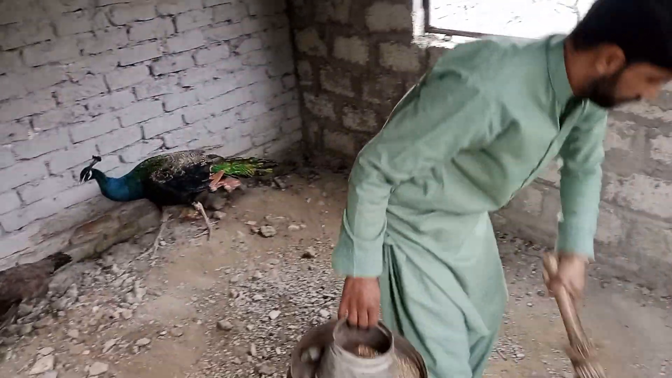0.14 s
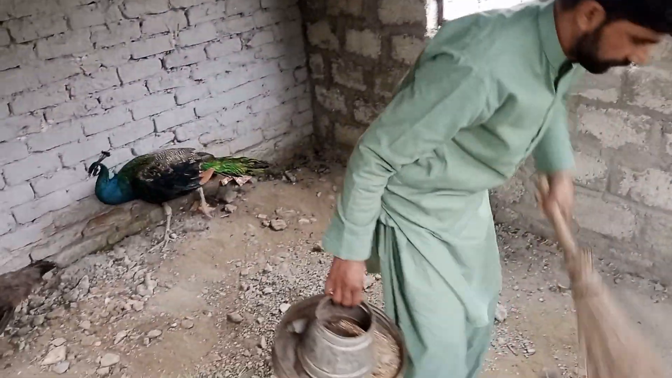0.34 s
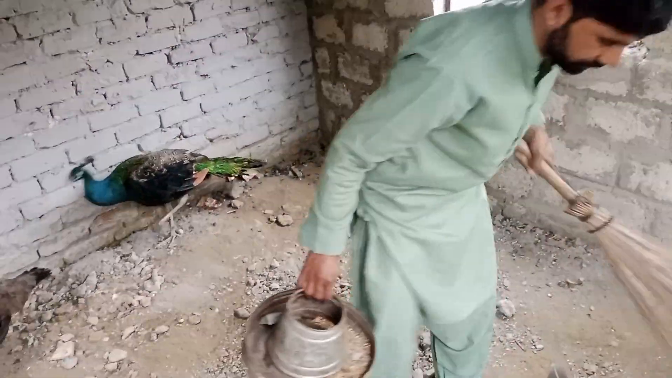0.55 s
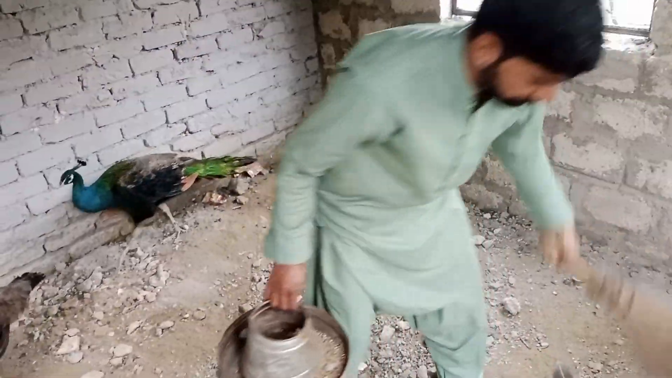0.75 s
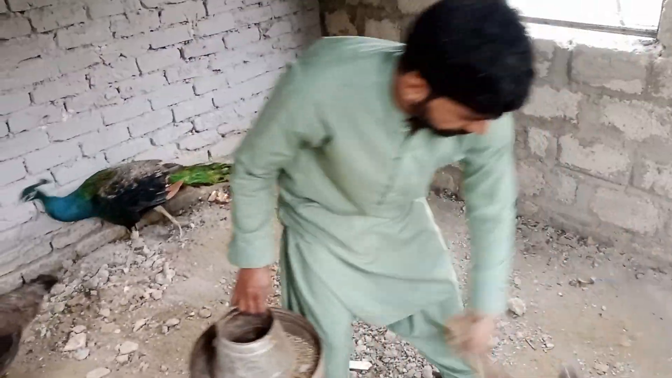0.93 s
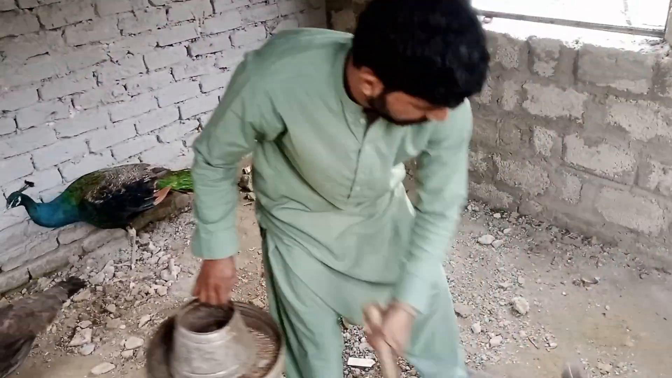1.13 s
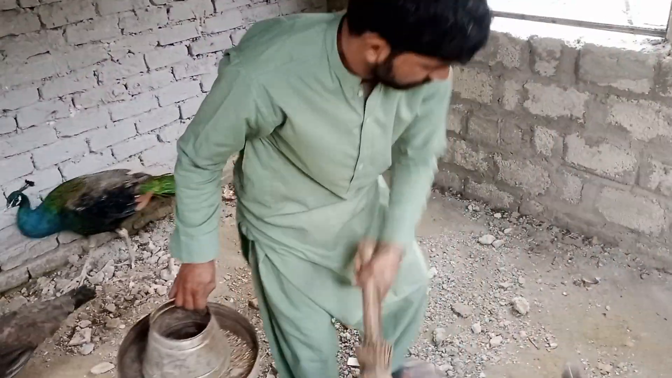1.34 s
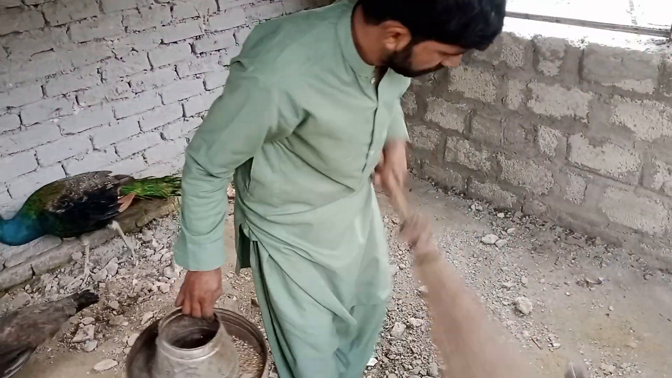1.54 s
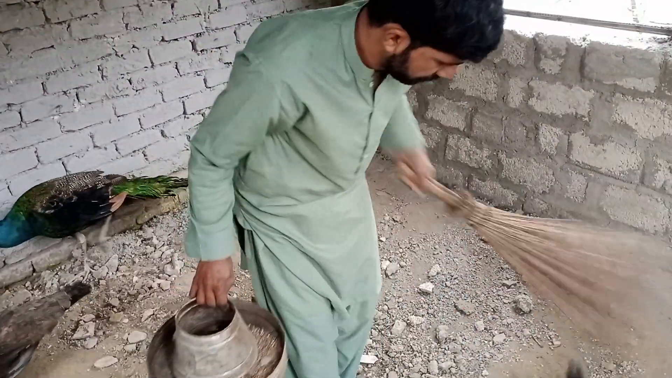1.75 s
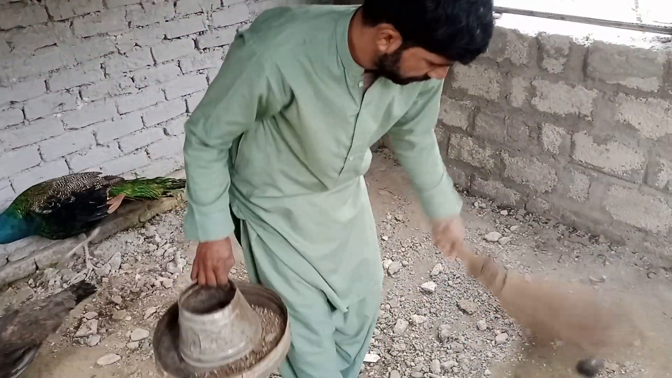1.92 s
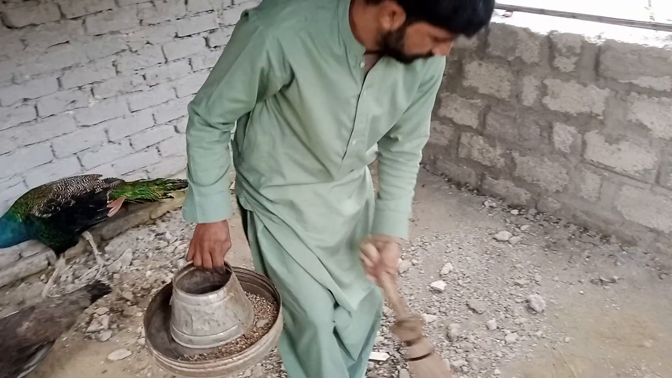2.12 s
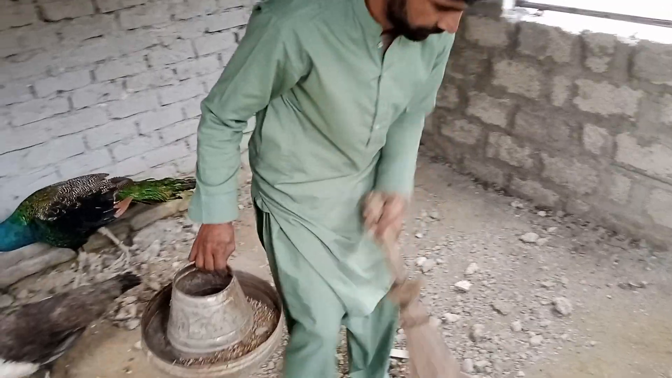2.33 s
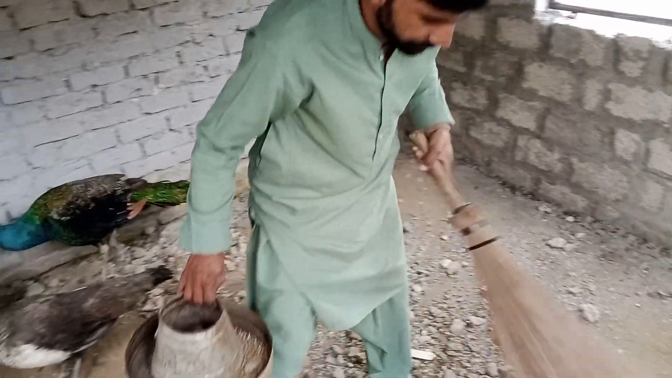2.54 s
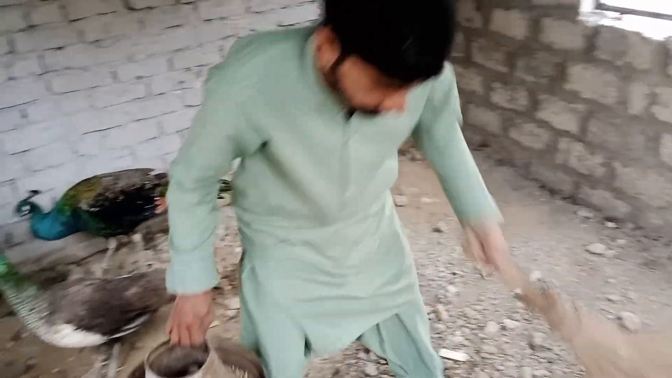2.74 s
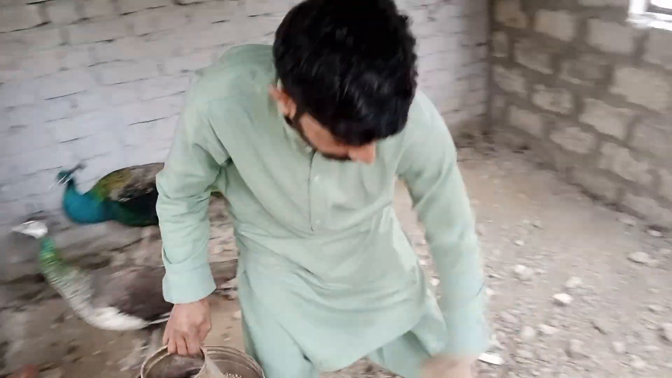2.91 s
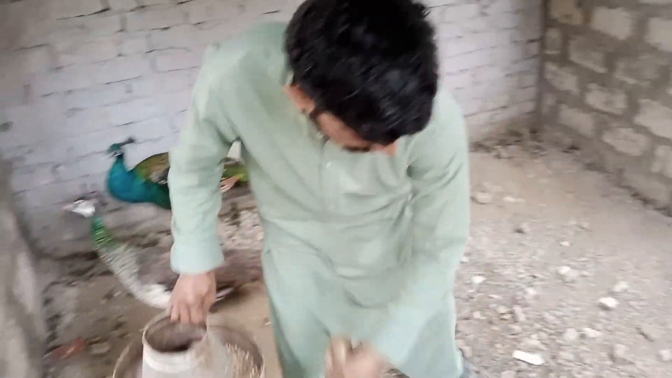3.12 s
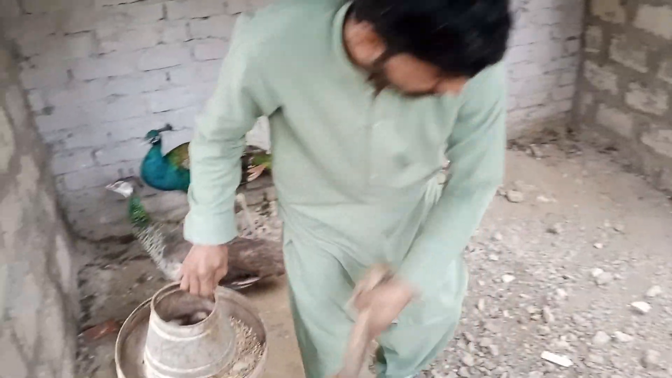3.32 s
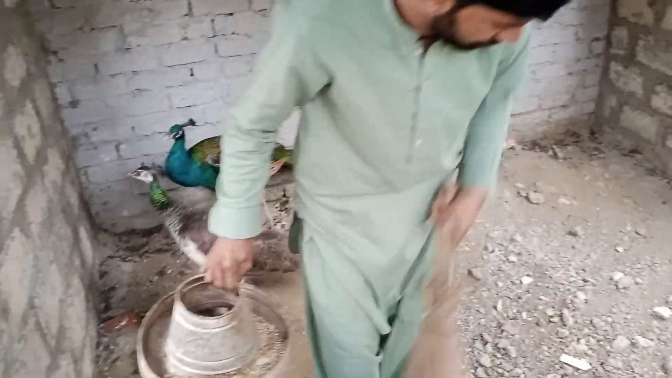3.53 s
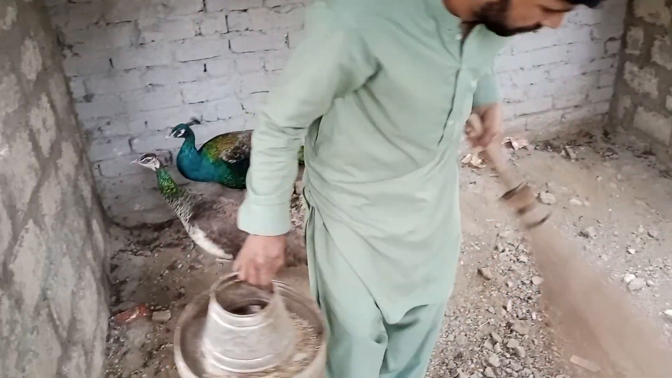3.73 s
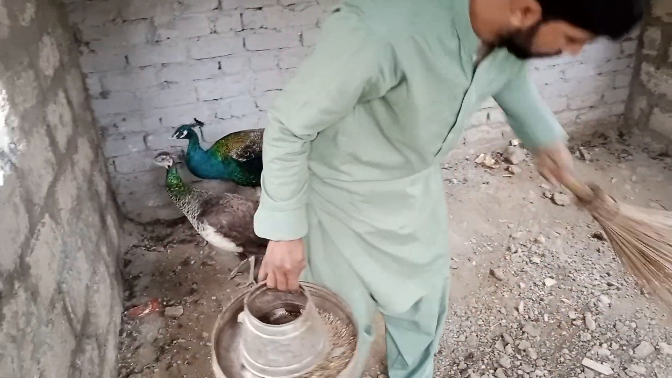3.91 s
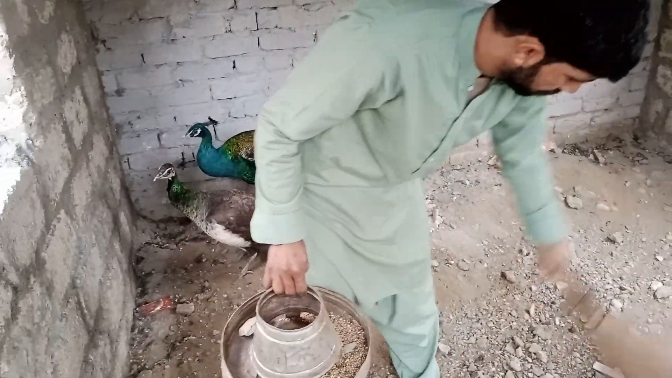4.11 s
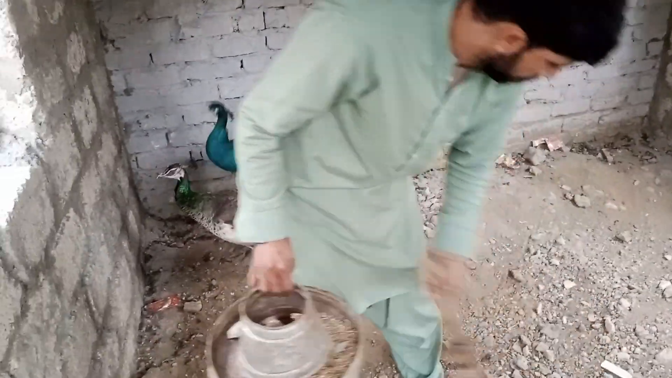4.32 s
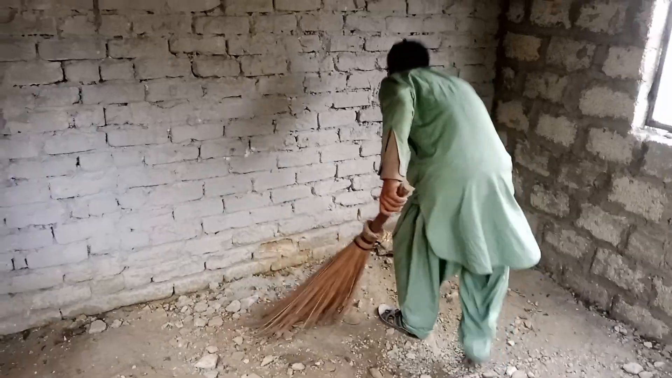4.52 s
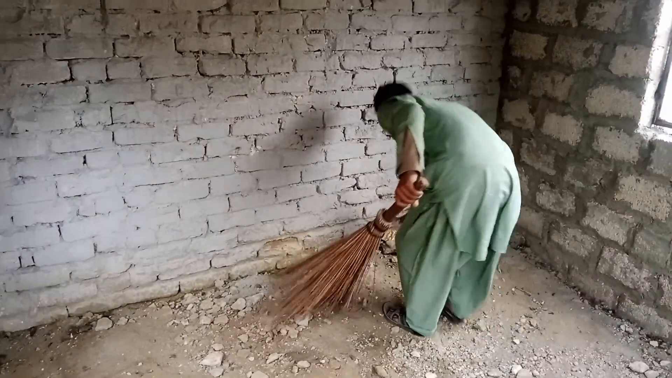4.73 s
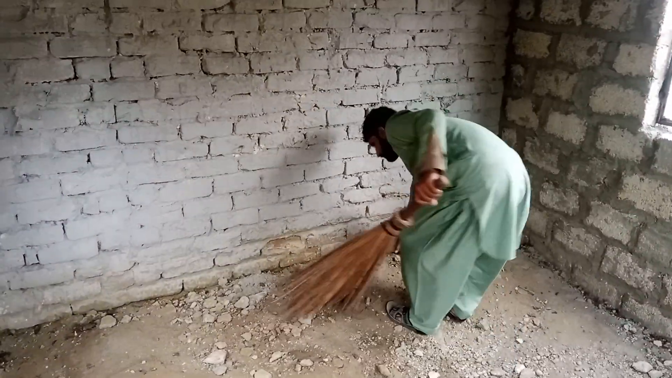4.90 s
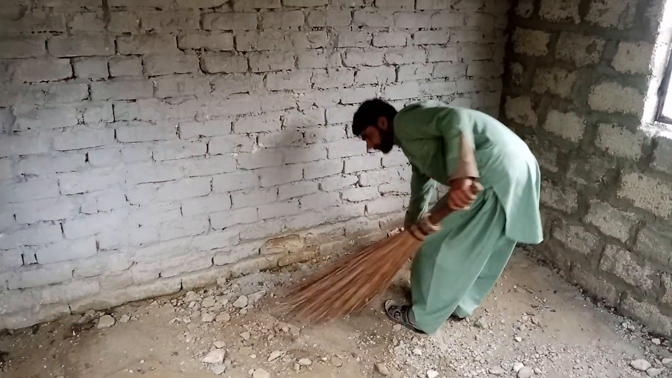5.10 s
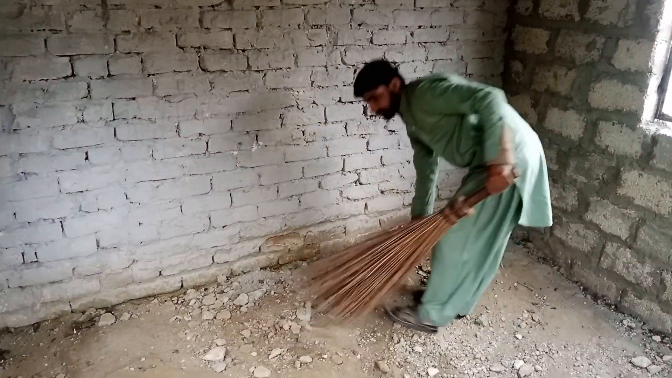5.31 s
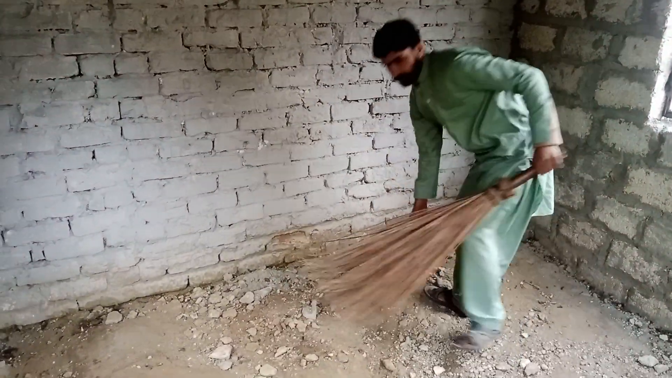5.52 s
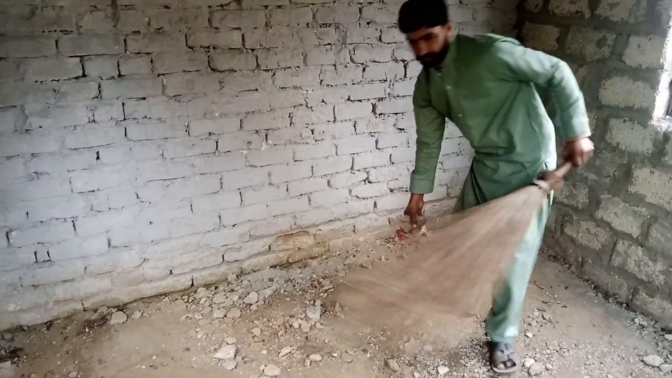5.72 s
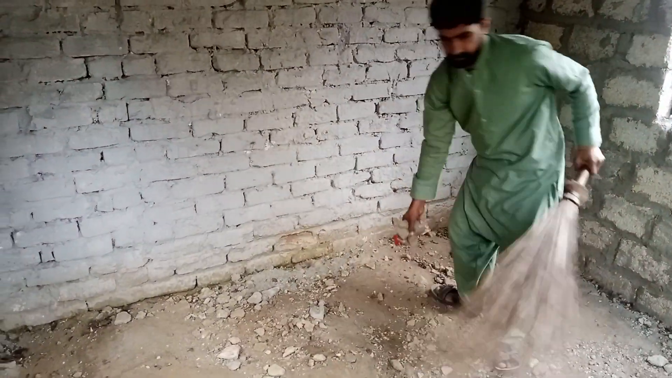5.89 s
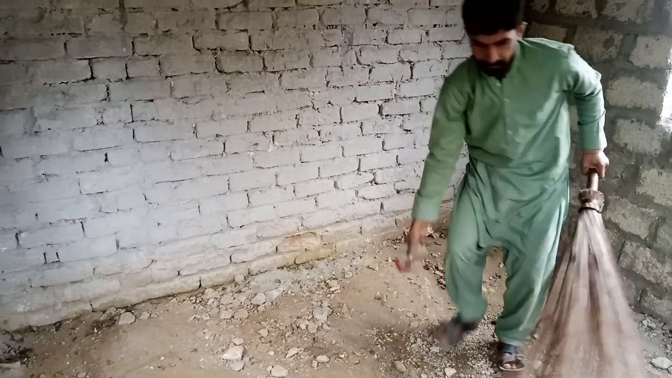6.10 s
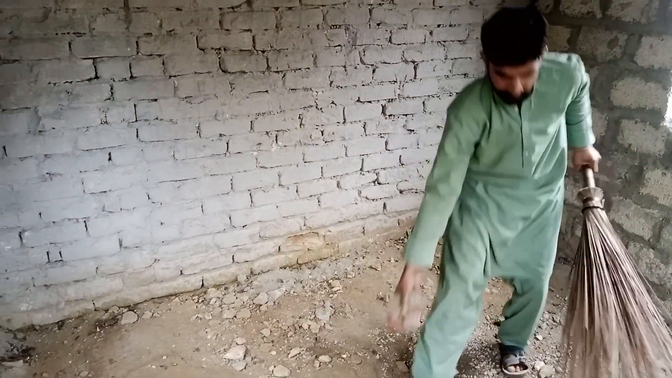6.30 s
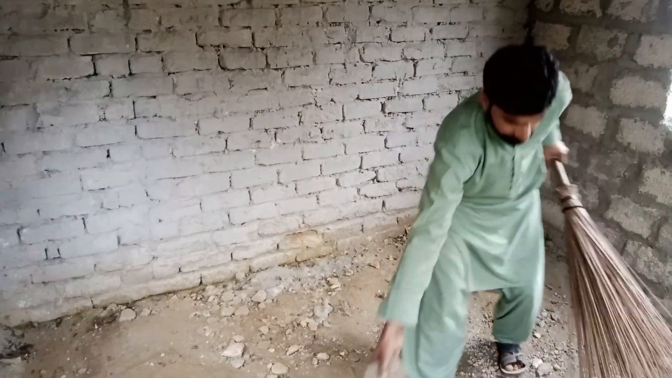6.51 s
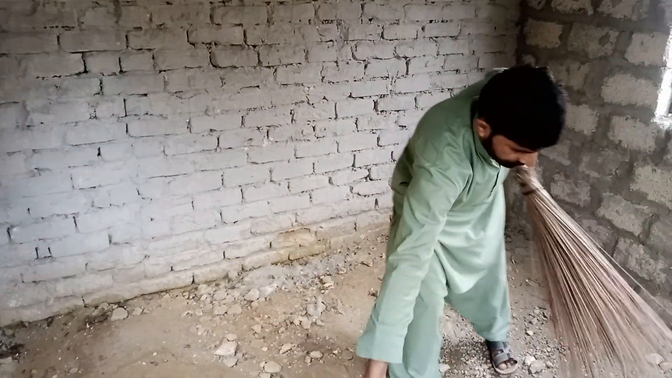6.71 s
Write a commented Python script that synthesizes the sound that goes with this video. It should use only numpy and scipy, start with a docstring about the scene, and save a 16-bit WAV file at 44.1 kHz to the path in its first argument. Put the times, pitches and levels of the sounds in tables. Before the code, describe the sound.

A straw broom rasps over gritty dirt in brisk close strokes, peafowl cluck softly, then the broom turns distant with light scuffs and pebble clicks.

```python
"""Brick shed, dirt floor: a straw broom sweeps grit close to the microphone, then the scene changes to a
farther spot with light dabs and scuffs. The broom is hiss and grain ticks in four registers, driven by
pressure, with loose stones rolling along. Knocked pebbles are resonant rattles; peafowl grunt and cluck as
pulses and puffs through throat resonances; small birds chirp as gliding whistles. The yard murmurs as shaped
noise."""
import sys
import numpy as np
from scipy import signal
from scipy.fft import rfft, irfft, next_fast_len
from scipy.io import wavfile
from scipy.ndimage import uniform_filter1d

SR = 44100
rng = np.random.default_rng(int(sys.argv[2]) if len(sys.argv) > 2 else 0)


def waveform_to_disk(signal):
    """Save audio, clipped to [-1, 1], as 16-bit WAV at the path in sys.argv[1]."""
    frames = np.transpose(np.atleast_2d(signal))
    scaled = np.clip(frames, -1, 1) * 32767
    samples = np.round(scaled).astype(np.int16)
    wavfile.write(sys.argv[1], SR, samples)


N = 297675

SCENE_CHANGE_S = 4.4135  # the broom is near before this time; then the scene changes to a farther spot
# straw on grit as the microphone colours it, a relative spectrum: [f/Hz, density/dB per Hz]
SCRATCH_SPECTRUM = [(60, -50), (170, -24), (500, -20), (1390, -12), (1840, -3.5), (3000, 3.5), (3790, -1.5),
                    (4460, -20.5), (6000, -13), (8000, -33), (12300, -31), (13850, -37), (14600, -26),
                    (15700, -29)]


def broom():
    """Strokes, dabs and scuffs set how hard the grit is rubbed; the straws catch and let go unevenly."""
    # Levels are those of the rasp; weight (coarse grit) and brightness (straw tips) are relative to it.
    # pushes and grazes of the near broom: [full at t/s, held/s, level/dB, rise/dB per s, fall/dB per s,
    # weight/dB, brightness/dB]
    strokes = [(-.05, 0.13, -23, 150, 41.5, -17.5, -14), (.3, 0.056, -34, 100, 78, -18, -20),
               (.76, .05, -40, 321, 38, -15.5, -35), (.85, 0.061, -30.5, 500, 44, -32, -13.5),
               (.95, 0.026, -22.5, 133, 36, -18.5, -17.5), (1.2, 0.11, -22.5, 81, 63.5, -21.5, -16),
               (1.45, 0.02, -35.5, 80, 55, -13.5, -20), (1.885, .06, -40, 600, 40, -31, -18.5),
               (2.038, 0.15, -25, 187, 31.5, -20, -16.5), (2.925, 0.074, -31.5, 500, 59, -6, -6),
               (2.988, 0.083, -21, 153, 57, -22, -15.5), (3.258, 0.042, -23, 106, 61.5, -18.5, -13.5),
               (3.43, 0.035, -36.5, 100, 45, -13.5, -20.5), (4.035, 0.044, -43, 600, 40, -10, -18),
               (4.202, .3, -26, 193, 40, -17, -13.5)]
    # light dabbing at the farther spot, joined by straight lines: [t/s, level/dB, weight/dB, brightness/dB]
    dabs = [(4.42, -41.5, -5.5, -20), (4.62, -47.5, -21, -19), (4.78, -49, -0.5, -23),
            (4.93, -49, -13, -31), (5, -44, -4, -22), (5.16, -45, -12, -20), (5.39, -46.5, -17, -14.5),
            (5.58, -52, -11, -19), (6, -61, -16, -38), (6.44, -59.5, -6, -31), (6.56, -52, -8, -23),
            (6.69, -43.5, -24, -19), (6.72, -60, -18, -29), (6.75, -49, -20, -24)]
    # short scuffs of sandal and straw: [t/s, level/dB, weight/dB, brightness/dB, t60/s]
    scuffs = [(1.784, -41, -6, -15, 0.073), (2.89, -40.5, 4.5, -20, 0.19), (3.572, -24.5, -5.5, -47, 0.073),
              (3.913, -43, 5, -35, 0.038), (3.969, -33.5, -19, -27, 0.16), (4.766, -45, -3, -23, 0.49),
              (4.8234, -25, -0.5, -65, 0.1), (4.956, -33.5, -6, -17, 0.12), (5.0195, -32.5, -15, -25, .16),
              (5.044, -36.5, -15, -23, 0.4), (5.108, -41, 1.5, -45, 0.065), (5.274, -38.5, -26, -14, 0.12),
              (5.352, -37.5, -8, -20, 0.29), (5.386, -32.5, -22, -21, 0.12),
              (5.529, -36.5, -35.5, -22, 0.18), (5.589, -38, -9, -16, 0.062), (5.668, -44, -16, -36, .086),
              (5.764, -48, 6.5, -43, 0.15), (5.817, -48, -20, -36, 0.13), (5.849, -44, -15, -44, 0.058),
              (5.8906, -53, 6, -44, 0.32), (6.0845, -41, -23, -28, 0.074), (6.157, -48, -25, -22, .11),
              (6.202, -41, -11, -25, 0.13), (6.313, -42, 0, -43, 0.082), (6.372, -42, -4.5, -20, 0.2),
              (6.493, -46, 1.1, -45, 0.094), (6.5545, -43, -15, -31, .11), (6.581, -41, -8, -26, 0.41),
              (6.626, -28, -13, -26, .18)]
    scuff_rise_s = 0.004  # time constant

    t = np.arange(N) / SR
    near_power = sum(push(t, *row) for row in strokes)
    dab_s, *dab_columns = np.transpose(dabs)
    dab_db = registers_db(*[np.interp(t, dab_s, column) for column in dab_columns])
    power = np.where(t < SCENE_CHANGE_S, near_power, gain_of(2 * dab_db))

    u = np.arange(SR // 2) / SR
    for s, level_db, weight_db, bright_db, t60 in scuffs:
        shape = (1 - np.exp(-u / scuff_rise_s)) * gain_of(-60 * u / t60)
        levels = gain_of(registers_db(level_db, weight_db, bright_db))
        add(power, s, np.outer(levels, shape) ** 2)

    # one shared unevenness, plus a little of its own in each register
    catch_db = 1.38 * wander(5.7) + 0.27 * np.array([wander(10) for _ in range(4)])
    scratch = (grit() * np.sqrt(power) * gain_of(catch_db)).sum(0)

    # the light dabs set more loose stones rolling
    stones_db = -19.0 + 4.5 * (t > SCENE_CHANGE_S)
    # an exponent below 0.5: stones keep rolling under light pressure
    stones = gain_of(stones_db) * pebbles() * (power[0] + power[1]) ** 0.44
    return scratch + stones


def push(t, s, held_s, level_db, rise_db_per_s, fall_db_per_s, weight_db, bright_db):
    """Power of the four registers for one push of the broom: swell, hold, fall."""
    # slopes of rumble, rasp, rustle and fizz: [factor on the push's own rise or fall]
    rise_pace = [0.83, 1.0, 1, 0.87]
    fall_pace = [.85, 1.0, 1.1, 1.3]  # the straw tips die first
    round_s = 0.06  # averaging span that rounds the corners

    early = np.maximum(s - t, 0)
    late = np.maximum(t - s - held_s, 0)
    drop_db = np.outer(rise_pace, rise_db_per_s * early) + np.outer(fall_pace, fall_db_per_s * late)
    drop_db = uniform_filter1d(drop_db, round(round_s * SR), axis=1, mode="nearest")
    return gain_of(2 * (registers_db(level_db, weight_db, bright_db)[:, None] - drop_db))


def registers_db(level_db, weight_db, bright_db):
    """Levels of rumble, rasp, rustle and fizz; the rustle follows the straw tips part of the way."""
    rustle_db = level_db - 1.5 + 0.51 * bright_db
    return np.array([level_db + weight_db, level_db, rustle_db, level_db + bright_db])


def grit(ticks_per_s=2500, spread_db=3.5, tick_share=0.35):
    """Countless straw slips make a hiss, bigger grains tick out of it; split into four registers."""
    ticks = gain_of(spread_db * np.minimum(rng.exponential(1, N), 4)) * rng.choice([-1, 1], N)
    ticks *= rng.random(N) < ticks_per_s / SR
    rubbing = tick_share * evened(ticks) + (1 - tick_share) * rng.standard_normal(N)

    size = next_fast_len(N)
    hz = np.fft.rfftfreq(size, 1 / SR)
    spectrum = rfft(rubbing, size) * gain_of(read(SCRATCH_SPECTRUM, hz))
    below = [1 / (1 + (hz / edge_hz) ** 8) for edge_hz in (1400, 4600, 8000)]
    bands = [below[0], below[1] - below[0], below[2] - below[1], 1 - below[2]]
    return np.array([evened(irfft(spectrum * band, size)[:N]) for band in bands])


def pebbles(per_s=260, spread_db=6.0):
    """Loose stones roll and click, each click ringing a few cycles at one of 30 notes."""
    rolling = np.zeros(N)
    u = np.arange(1500) / SR
    for hz, cycles in zip(np.geomspace(650, 4300, 30), rng.uniform(8, 26, 30)):
        sizes = gain_of(spread_db * np.minimum(rng.exponential(1, N), 3))
        clicks = sizes * (rng.random(N) < per_s / 30 / SR)
        ring = np.sin(2 * np.pi * hz * u) * np.exp(-2 * hz * u / cycles) * (1 - np.exp(-u / 0.0025))
        ring *= gain_of(0.81 * read(SCRATCH_SPECTRUM, hz)) / np.linalg.norm(ring)
        rolling += signal.oaconvolve(clicks, ring)[:N]
    return evened(rolling)


def clack(s, level_db, ring_hz, t60):
    """Two pebbles knocked together: a short rattle of contacts rings one stone note."""
    u = np.arange(SR // 4) / SR
    rattle = rng.standard_normal(len(u)) * gain_of(-60 * u / t60) * (1 - np.exp(-u / 0.00025))
    width_hz = 60 + 0.12 * ring_hz
    ring = resonate(resonate(rattle, ring_hz, width_hz), ring_hz, width_hz)
    loudness = np.sqrt(np.mean(ring[:round(t60 * SR / 5)] ** 2))  # rms of the opening
    return s, gain_of(level_db) * ring / loudness


def knock(s, level_db, ring_hz, t60):
    """A larger stone is kicked and rings in all its modes at once."""
    # modes of the stone: [multiple of the main ring, level/dB]
    modes = [(.3, -4), (.67, 4), (1.0, 2), (1.92, 8), (3.45, -5)]
    return s, sum(clack(s, level_db + db, ring_hz * multiple, t60)[1] for multiple, db in modes)


def fowl(peak_s, swell_s, fade_s, level_db, first_hz, middle_hz, last_hz, rough,
         throat_first_hz, throat_last_hz, chest_db, beak_db):
    """Windpipe pulses and noise puffs drive a chest tone, a throat resonance and a ring in the beak."""
    s, level_db, hz = note(peak_s, swell_s, fade_s, level_db, first_hz, middle_hz, last_hz)
    throat_hz = np.linspace(throat_first_hz, throat_last_hz, len(hz))
    jitter = uniform_filter1d(rng.standard_normal(len(hz)), 100)
    turns = np.cumsum(hz * (1 + 1.24 * rough * jitter)) / SR

    harmonics = range(1, round(4200 / hz.mean()) + 1)
    pulses = sum(np.cos(2 * np.pi * k * turns) for k in harmonics)
    breath = (0.9 + np.exp(-(turns % 1) / 0.88)) * rng.standard_normal(len(hz))  # strongest as a turn starts
    puffs = resonate(breath, 1280, 1900)
    drive = (1 - rough) * evened(pulses) + rough * evened(puffs)

    parts = ((0, throat_hz, 600), (chest_db, 300, 450), (beak_db, 2850, 750))  # dB, Hz, width Hz
    voice = sum(gain_of(db) * resonate(resonate(drive, f, width), f, width) for db, f, width in parts)
    return s, gain_of(level_db) * evened(voice) * signal.windows.tukey(len(hz), 0.12)


def chirp(*row):
    """A small bird's thin whistle, blurred by a share of fluttering noise on the same pitch."""
    s, level_db, hz = note(*row)
    tone = np.sqrt(2) * np.sin(2 * np.pi * np.cumsum(hz) / SR)
    fuzz = resonate(resonate(rng.standard_normal(len(hz)), hz, 110), hz, 110)
    whistle = evened(0.58 * tone + 0.42 * evened(fuzz))
    return s, gain_of(level_db) * whistle * signal.windows.tukey(len(hz), 0.3)


def note(peak_s, swell_s, fade_s, level_db, *pitch_hz):
    """A bird note: level swells to a peak and fades while the pitch glides through evenly spaced values."""
    entry_db, exit_db = -11.5, -12.5  # start and end, relative to the peak
    t = np.arange(-swell_s, fade_s, 1 / SR)
    level = level_db + np.where(t < 0, entry_db * -t / swell_s, exit_db * (t / fade_s) ** 0.91)
    hz = np.interp(t, np.linspace(-swell_s, fade_s, len(pitch_hz)), pitch_hz)
    return peak_s - swell_s, level, hz


def air():
    """Steady murmur of the yard: shaped noise with patches drifting in time and frequency."""
    # relative spectrum of the murmur: [f/Hz, density/dB per Hz]
    murmur = [(25, -38), (45, -23), (65, 14), (110, 4), (268, -5.5), (400, 1), (900, -21), (1550, -2),
              (3470, -28), (4540, -20), (6110, -20), (8220, -32), (15700, -65)]
    frames, hz = N // 256 + 5, np.fft.rfftfreq(1024, 1 / SR)
    a, b, patches = rng.standard_normal((frames, 513, 3)).T
    patches = evened(uniform_filter1d(uniform_filter1d(patches, 8, 0), 14, 1))
    z = (a + 1j * b) * gain_of(read(murmur, hz)[:, None] + 2.5 * patches)
    return gain_of(-55.5) * evened(signal.istft(z, nperseg=1024, noverlap=768)[1][:N])


def shed(x, wet_db):
    """The direct sound plus sparse wall echoes, each band dying at its own speed."""
    # decay between the brick walls: [f/Hz, t60/s]
    decay = [(200, 0.32), (1500, 0.085), (5000, 0.033), (15000, 0.21)]
    taps = np.zeros(SR // 2)
    at = np.arange(200, SR // 2 - 20, 20)
    taps[at + rng.integers(0, 20, len(at))] = rng.choice([-1., 1.], len(at))
    hz, t, z = signal.stft(taps, SR, nperseg=256)
    tail = signal.istft(z * gain_of(-60 * t / read(decay, hz)[:, None]), SR, nperseg=256)[1]
    return x + gain_of(wet_db) * signal.fftconvolve(x, tail / np.linalg.norm(tail))[:N]


def farther(x):
    """Distance takes the edge off the broom, and the far corner lifts two bands."""
    # lift of the far corner: [f/Hz, width/Hz, added level/dB]
    corner = [(2220, 110, -6), (3440, 100, -10.5)]
    dull = signal.lfilter(*signal.butter(1, 11000, fs=SR), x)
    near = np.arange(N) < SCENE_CHANGE_S * SR
    placed = np.where(near, x, dull)
    return placed + ~near * sum(gain_of(db) * resonate(placed, hz, width) for hz, width, db in corner)


def gain_of(db):
    """Decibels to a factor."""
    return 10 ** (np.asarray(db) / 20)


def evened(x):
    """Scales to rms 1."""
    return x / np.sqrt(np.mean(x ** 2) + 1e-20)


def read(points, hz):
    """Reads a table on a log-frequency axis."""
    f, value = np.transpose(points)
    return np.interp(np.log(hz + 1), np.log(f + 1), value)


def add(mix, s, sound):
    """Adds a sound at a time in seconds."""
    part = mix[..., round(s * SR):][..., :sound.shape[-1]]
    part += sound[..., :part.shape[-1]]


def resonate(x, hz, width_hz):
    """A resonance of gain 1 that may move: shift its pitch to zero, smooth, shift back."""
    turn = np.exp(2j * np.pi * np.cumsum(hz * np.ones(len(x))) / SR)
    r = np.exp(-np.pi * width_hz / SR)
    return 2 * (turn * signal.lfilter([1 - r], [1, -r], x / turn)).real


def wander(corner_hz):
    """Slow chance of rms 1: noise drawn 200 times a second and smoothed above a corner."""
    steps = rng.standard_normal(round(N / SR * 200) + 2)
    smooth = signal.lfilter([1], [1, -np.exp(-2 * np.pi * corner_hz / 200)], steps)
    return evened(np.interp(np.arange(N), np.linspace(0, N, len(steps)), smooth))


def scene():
    """All sources in the shed over the yard murmur; when the scene changes the near echoes stop short."""
    # pebbles knocked together: [t/s, level/dB, ring f/Hz, t60 of the rattle/s]
    clacks = [(.355, -49, 566, 0.07), (0.533, -50.5, 3000, 0.033), (0.649, -48, 1360, 0.043),
              (0.7, -41, 2830, 0.056), (1.59, -46.5, 380, .15), (2.553, -51.5, 500, .083),
              (2.86, -44, 620, 0.41), (2.868, -33, 2380, 0.095), (2.879, -29, 2240, 0.086),
              (2.891, -34.5, 1740, 0.13), (2.926, -27.5, 3040, 0.087), (2.996, -27.5, 660, 0.038),
              (3.655, -39, 480, 0.03), (3.973, -40, 6550, .03), (4.274, -42.5, 106, 0.1),
              (4.769, -42, 2620, 0.14), (5.015, -44, 2740, .15), (5.04, -41, 1280, .05),
              (5.365, -48.5, 670, 0.12), (5.9, -50.5, 573, .12), (6.37, -56, 500, 0.22),
              (6.49, -53, 865, 0.059), (6.582, -38, 463, 0.076), (6.637, -35.5, 1710, 0.13)]
    # a larger stone kicked: [t/s, level/dB, main ring f/Hz, t60 of the rattle/s]
    knocks = [(4.826, -44, 628, .11), (5.772, -58, 850, 0.091)]
    # peafowl: [peak t/s, swell/s, fade/s, peak level/dB, first, middle and last pitch f/Hz,
    # roughness 0-1, first and last throat f/Hz, chest tone/dB, beak ring/dB]
    calls = [(1.732, 0.0084, 0.037, -27.5, 492, 519.5, 490, 0.24, 1230, 1480, -16.5, 1),
             (2.78, .07, 0.052, -25.5, 244.9, 276.7, 265, 0.5, 500, 1030, -47, -13),
             (2.77, 0.011, 0.07, -26, 406, 441, 407, 0.29, 1650, 1650, -10, -13.5),
             (3.3, .055, 0.067, -32, 377, 356, 330, 0.2, 690, 656, -4, -20),
             (3.58, 0.11, 0.059, -35.5, 211.5, 209, 215.6, 0.088, 606, 1030, 5.5, -23),
             (3.639, 0.034, 0.038, -36.5, 305, 272, 237, 0.65, 890, 696, -6, -20),
             (3.73, .01, 0.022, -27, 520, 526, 495, 0.24, 1560, 1530, -20, -3),
             (4.14, 0.027, 0.036, -40.5, 312, 387, 453, 0.17, 650, 420, 16, -25),
             (4.38, 0.027, 0.045, -38, 323, 318, 335, 0.12, 644, 640, -3, -25)]
    # peeps of small birds and chicks: [peak t/s, swell/s, fade/s, peak level/dB,
    # first, middle and last pitch f/Hz]
    peeps = [(1.693, 0.013, .025, -37, 1240, 1213, 1170), (1.838, .015, 0.019, -40, 3300, 2850, 2400),
             (1.948, .006, 0.049, -46.5, 613, 620, 630), (3.863, 0.023, 0.049, -44, 3340, 3200, 2960),
             (3.956, 0.047, 0.018, -47, 2800, 2410, 2220), (4.09, 0.055, 0.0298, -51, 1756, 1126, 700),
             (4.6, .008, .02, -37.5, 3500, 3310, 3100), (4.634, .012, .02, -39.5, 3010, 2880, 2770),
             (4.672, .01, .03, -42, 2960, 2870, 2790), (4.789, .022, 0.037, -34.5, 1480, 1468, 1360),
             (5.92, 0.022, 0.12, -53, 3980, 3390, 3370), (6.058, .006, 0.056, -46.5, 2280, 2124, 2060),
             (6.076, 0.011, .045, -50, 1560, 1413, 1480)]

    mix = farther(broom())
    for play, table in ((clack, clacks), (knock, knocks), (fowl, calls), (chirp, peeps)):
        for row in table:
            add(mix, *play(*row))
    near = np.arange(N) < SCENE_CHANGE_S * SR
    heard = near * shed(mix * near, wet_db=-8.5) + shed(mix * ~near, wet_db=-6.5) + air()
    return np.array([heard, heard])


def record(dry):
    """One microphone on both channels, weak in the deepest bass, with a steep upper band limit."""
    thin = signal.sosfilt(signal.butter(2, 58, "high", fs=SR, output="sos"), dry)
    band_limit = signal.firwin(1023, 15750, window=("kaiser", 9), fs=SR)
    return signal.oaconvolve(thin, band_limit[None], "same")


dry = scene()
out = record(dry)
waveform_to_disk(out)
```